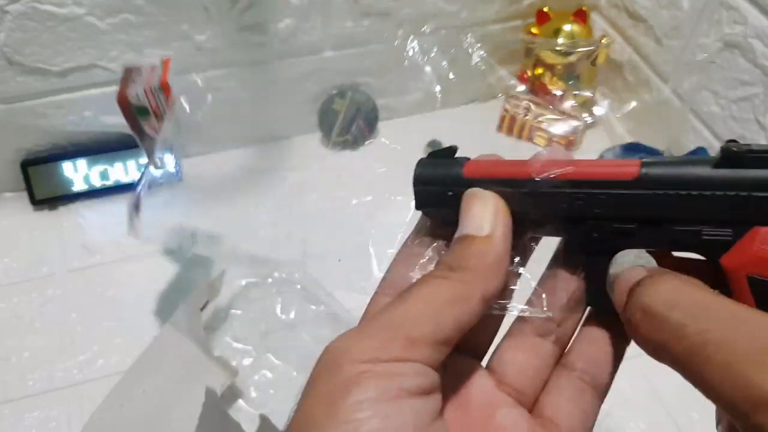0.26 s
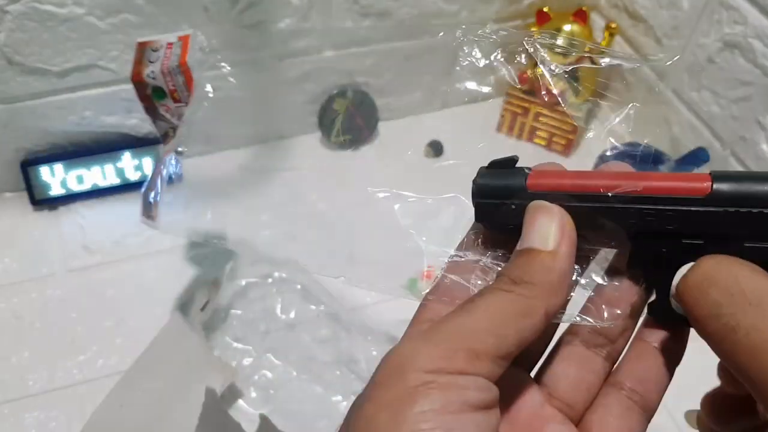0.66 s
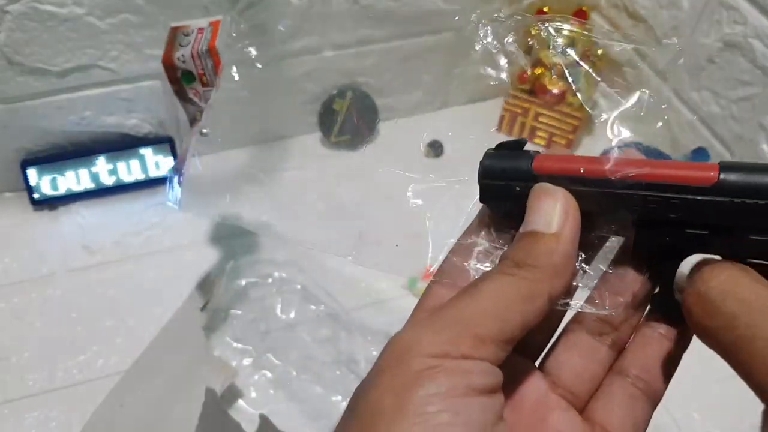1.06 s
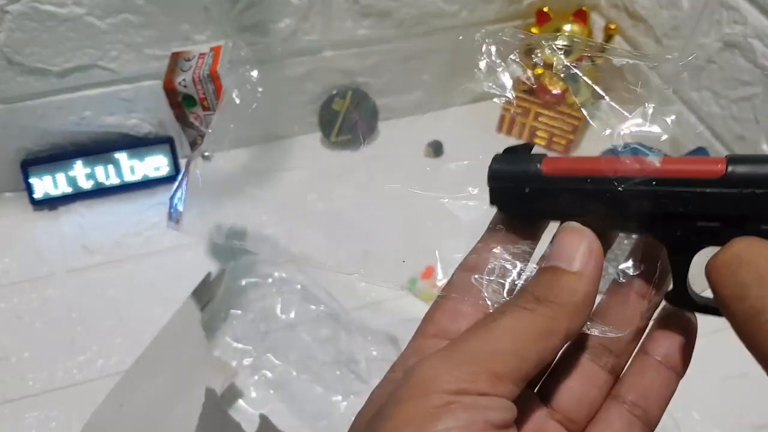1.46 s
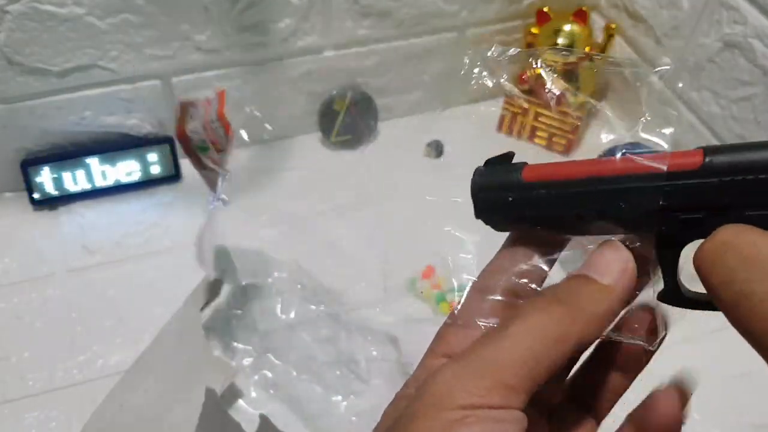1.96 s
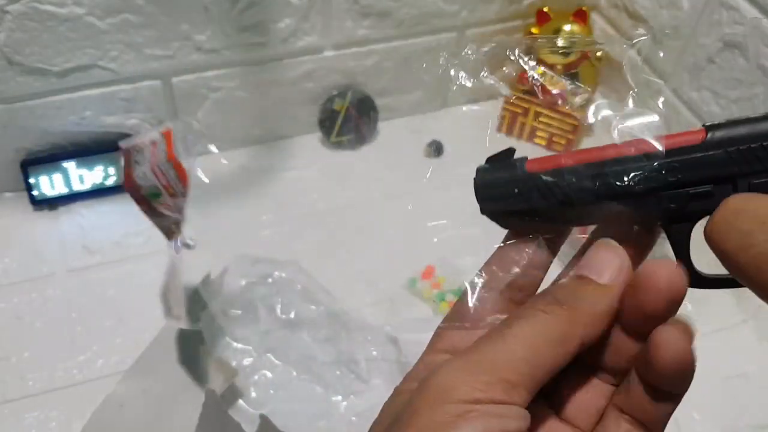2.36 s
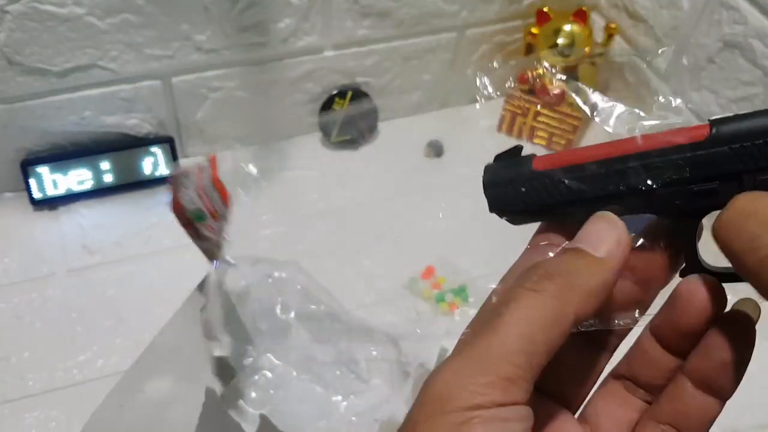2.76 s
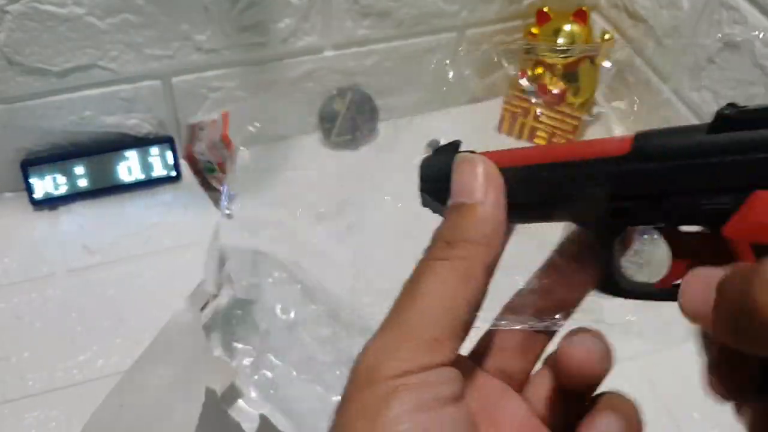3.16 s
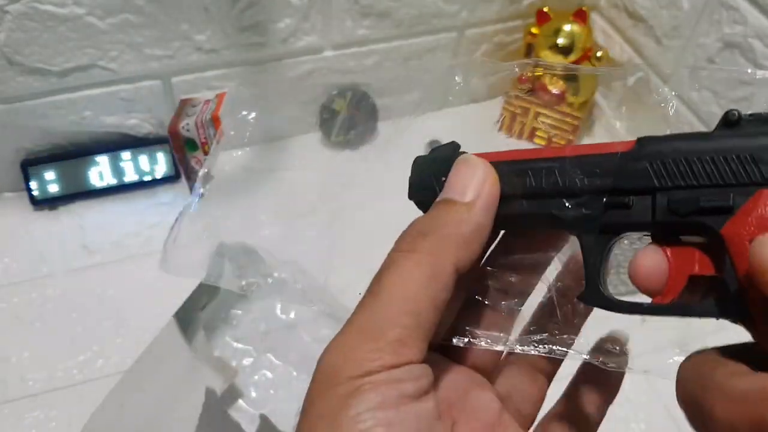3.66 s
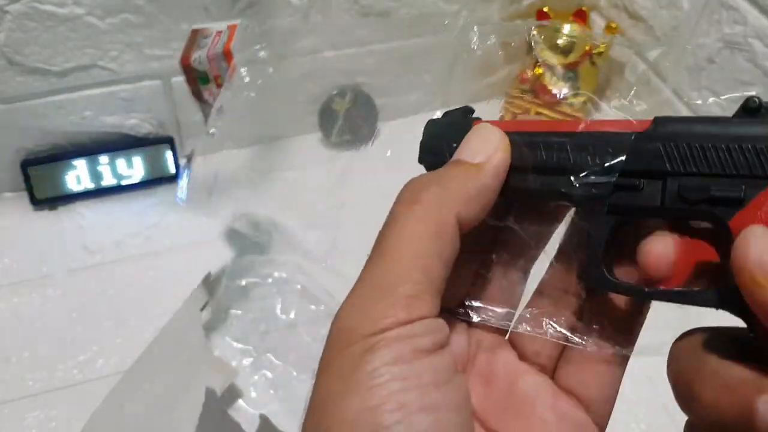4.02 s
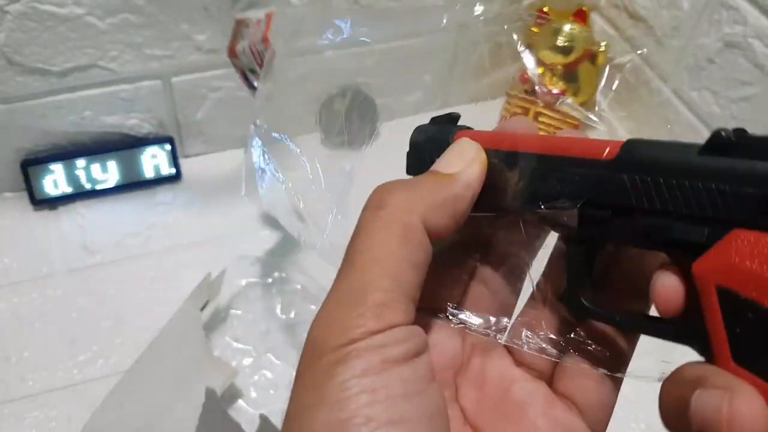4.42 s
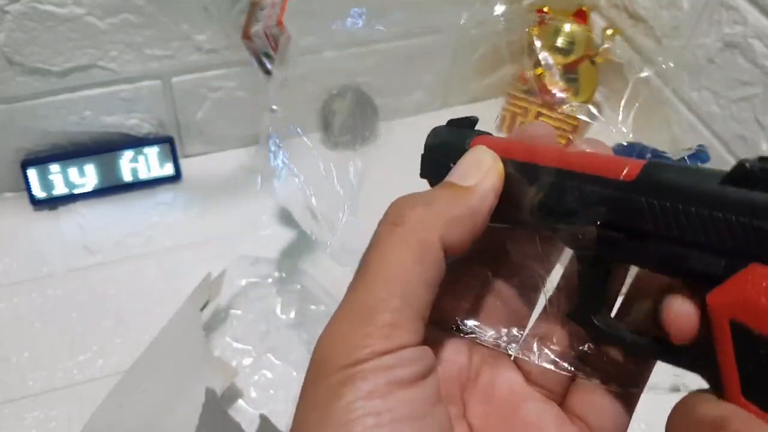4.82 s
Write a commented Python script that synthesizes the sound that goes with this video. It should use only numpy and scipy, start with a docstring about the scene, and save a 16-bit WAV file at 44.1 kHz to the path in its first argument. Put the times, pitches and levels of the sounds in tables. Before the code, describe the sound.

Brief crinkling of thin plastic, then a steady series of hard, dry spring-hammer cracks from a hollow toy pistol, each followed by a softer click as the trigger springs back. After a pause filled by crisp sheet crackle and faint knocks on the grip, two final snaps come, the last the strongest. Close stereo pickup, slightly left, short bright room tail, low background noise.

```python
"""A small hard room, with a plastic toy pistol held close to a stereo microphone. The trigger is pulled
seven times: a spring hammer snaps (noise bursts, ringing body modes, a low puff of pressure) and after
six of the snaps the trigger clicks back. A thin plastic sheet in the hand crinkles between, built from
popping creases. The room rings on as decaying noise, over low rumble, a faint tone and quiet air."""
import sys
import numpy as np
from scipy import signal
from scipy.fft import rfft, irfft
from scipy.io import wavfile
from scipy.ndimage import uniform_filter1d, minimum_filter1d

SR = 44100
rng = np.random.default_rng(int(sys.argv[2]) if len(sys.argv) > 2 else 0)


def nominal_scale(level):
    """Amplitude ratio for a level in decibels (scalar or array-like)."""
    x = np.asarray(level, float) / 20
    return 10 ** x


def wav_out(sig):
    """Save sig, one row per channel (or a flat mono array), as 16-bit PCM at SR to the path in sys.argv[1]."""
    wavfile.write(sys.argv[1], SR, np.round(np.clip(np.atleast_2d(sig).T, -1, 1) * 32767).astype(np.int16))


N = 224403  # length in samples

# Low rumble of the place. Each row: frequency in Hz, relative level in dB per Hz.
RUMBLE_SPECTRUM = [(25, -34), (70, -3.5), (110, -7), (190, -25), (350, -12), (800, -47.5)]
# Quiet air of the room. Each row: frequency in Hz, relative level in dB per Hz.
HUSH_SPECTRUM = [(150, -7.5), (800, -10), (2100, -3.5), (3500, -9.5), (7000, -22), (14000, -53)]
# Likeness of the background at the two microphones. Each row: frequency in Hz, likeness from 0 to 1.
LIKENESS = [(60, 1), (600, 0.47), (4000, 0.036)]
# Dying away of the room. Each row: frequency in Hz, t60 in s.
ROOM_T60 = [(200, 0.057), (700, 0.27), (2000, 0.36), (5000, 0.32), (10000, 0.27)]
# Course of the hand noise. Each row: time in seconds, sheet handling in dB (before the offsets in
# rustle and rubs), low rumble in dB.
HANDLING = [(0, -68, -51), (.12, -32.5, -60.5), (0.176, -50, -52.5), (0.259, -36, -49), (.35, -61, -54.5),
            (.6, -60, -56), (1.2, -58.5, -60.5), (1.9, -50, -66), (2.899, -48, -66.5), (3.3, -43, -64),
            (3.603, -41.5, -76), (3.678, -58.5, -74.5), (3.953, -55.5, -73), (4.028, -36, -61),
            (4.47, -45.5, -54), (4.8, -52.5, -65), (5.09, -46.5, -71)]
# Colour of the plastic sheet. Each row: frequency in Hz, relative level in dB per Hz.
SHEET_SPECTRUM = [(200, -30), (334, -20.5), (1140, -32), (1980, -11.5), (3560, -9.5), (6280, -1.5),
                  (11100, 3.5), (16000, 4.5)]
# The clearest creases of the sheet popping. Each row: start in seconds, peak in dB, facet pitch in Hz.
CREASES = [(0.0614, -37, 1520), (0.084, -28.5, 4580), (0.103, -25.5, 2760), (0.1208, -25, 4720),
           (0.1286, -27, 1050), (0.2009, -27.5, 1330), (0.2158, -20, 2030), (0.2559, -26, 1520),
           (0.283, -29, 1380), (0.298, -34.5, 2140), (0.3743, -29, 1450), (0.446, -37, 2200),
           (0.4906, -35.5, 3960), (0.585, -42, 2700), (1.059, -30.5, 2100), (1.279, -42.5, 2430),
           (1.329, -43.5, 2130), (1.3679, -33, 1900), (1.4123, -51, 1530), (1.4263, -40.5, 2780),
           (1.8405, -37.5, 2770), (1.87, -33.5, 1580), (2.241, -31, 2020), (2.3909, -34, 4570),
           (2.795, -34.5, 1680), (3.224, -38.5, 4160), (3.263, -42, 810), (3.29, -33.5, 1610),
           (3.311, -33, 2700), (3.393, -40, 2240), (3.4085, -32.5, 4760), (3.452, -31, 5700),
           (3.5192, -30.5, 3950), (3.5578, -31, 2120), (3.584, -36.5, 6560), (3.626, -28.5, 2080),
           (3.754, -40, 5300), (3.808, -35.5, 2180), (3.9764, -34, 3500), (4.0212, -23.5, 3720),
           (4.042, -27, 1370), (4.058, -27.5, 2720), (4.0899, -17.5, 3660), (4.1023, -17, 2080),
           (4.17, -22, 6730), (4.2223, -22.5, 3380), (4.25, -26, 7900), (4.343, -29, 910),
           (4.356, -26.5, 2840), (4.366, -26, 2270), (4.433, -30, 2150), (4.451, -28.5, 1550),
           (4.4667, -28, 3000), (4.4905, -30.5, 1590), (4.506, -32.5, 5500), (4.514, -22.5, 2700),
           (4.654, -37, 3170), (4.673, -38, 2980), (4.6964, -34, 2000), (4.711, -29, 2350),
           (4.757, -32, 2370)]
# Fingers knock the hollow grip. Each row: start in seconds, peak in dB, centre in Hz.
KNOCKS = [(3.621, -38, 300), (4.019, -39.5, 300), (4.079, -37, 380), (4.105, -31.5, 336), (4.186, -37, 725),
          (4.219, -30.5, 320), (4.592, -33, 630)]
# Loose parts rattle on after two snaps. Each row: start in seconds, peak in dB, t60 in s, centre in Hz,
# then three ringing pitches in Hz.
RATTLES = [(0.899, -16.5, 0.12, 4770, 5290, 4150, 2820), (4.537, -20, 0.12, 2210, 1320, 2045, 2980)]
# Modes of the hollow pistol body. Each row: frequency in Hz, mean relative level in dB, t60 in s.
BODY_MODES = [(1550, 2.5, 0.033), (2075, 4, 0.035), (2610, 1, 0.045), (3108, -5.5, 0.059), (3420, 0, 0.027),
              (4280, -1.5, 0.025), (5330, 2.5, .018), (5970, -2.5, .016)]
# The trigger springs back. Each row: start in seconds, peak in dB.
RETURNS = [(1.128, -17), (1.6827, -20), (2.17, -19.5), (2.665, -20), (3.062, -20.5), (4.7235, -16.5)]
# Colour of the trigger click. Each row: frequency in Hz, relative level in dB per Hz.
RETURN_CRACK = [(1000, -26), (2700, -4), (4800, -11), (6800, -6), (16000, -22)]
# Hammer snaps. Each row: start in seconds, peak in dB, low puff in dB relative to the peak,
# left-right difference of the puff in dB (before the pistol's own pan), rattle t60 in s,
# drive of the room in dB relative to the peak.
SNAPS = [(0.8904, -6, -8, 12.5, 0.012, -2), (1.4609, -8, -6.5, -0.5, 0.032, -6),
         (1.9594, -8, -6.5, 5, 0.027, -9), (2.473, -8, -9.5, 14, 0.031, -8),
         (2.8666, -7, -19.5, 8, 0.026, -10), (4.5279, -5.5, -3, 5.5, 0.006, -2),
         (4.9186, -4, -16.5, -21, 0.011, -13.5)]
# Colour of the hammer snap. Each row: frequency in Hz, relative level in dB per Hz.
SNAP_CRACK = [(290, -17.5), (1020, -12), (2230, -5), (3920, -2), (7100, -6.5), (9630, -4.5), (14000, -9),
              (16000, -25.5)]

PISTOL_PAN_DB = 3  # the pistol sits a little towards the left microphone


def read(points, hz):
    """A table read over log frequency."""
    table = np.transpose(points)
    return np.interp(np.log(hz + 1), np.log(table[0] + 1), table[1])


def amp_of(points, hz):
    """Gain of a dB spectrum."""
    return nominal_scale(read(points, hz))


def evened(x):
    """Scales to rms 1."""
    return x / np.sqrt(np.mean(x ** 2) + 1e-20)


def peaked(x):
    """Scales the smoothed peak envelope near 1, whatever the draw."""
    return x / np.sqrt(2 * uniform_filter1d((x ** 2).mean(0), 60).max())


def coloured(x, gain_at):
    """Filters the last axis by a gain over frequency."""
    hz = np.fft.rfftfreq(x.shape[-1], 1 / SR)
    return irfft(rfft(x) * gain_at(hz), x.shape[-1])


def left_right(pan_db):
    """Level in dB at each microphone for a left-right difference in dB."""
    return np.array([[pan_db], [-pan_db]]) / 2


def add(mix, s, sound, pan_db=0):
    """Lays a two-channel sound into the mix, starting at s seconds."""
    part = mix[:, max(round(s * SR), 0):][:, :sound.shape[1]]
    part += sound[:, :part.shape[1]] * nominal_scale(left_right(pan_db))


def burst(t60, rise, likeness, size=4096):
    """Noise with a short rise and an exponential fall, partly unrelated in the two microphones."""
    t = np.arange(size) / SR
    a, b = rng.standard_normal((2, size))
    likeness = np.clip(likeness, 0, 1)
    noise = np.array([a, likeness * a + np.sqrt(1 - likeness ** 2) * b])
    return noise * (1 - np.exp(-t / rise)) * nominal_scale(-60 * t / t60)


def background(spectrum):
    """Steady noise, more alike in both microphones at low pitch."""
    a, b = rfft(rng.standard_normal((2, N)))
    hz = np.fft.rfftfreq(N, 1 / SR)
    same = np.clip(read(LIKENESS, hz), 0, 1)
    pair = np.array([a, same * a + np.sqrt(1 - same ** 2) * b])
    return evened(irfft(pair * amp_of(spectrum, hz), N))


def rumble(level_db):
    """Low noise of moving level, with a faint steady-pitched tone under it."""
    tone = np.sin(2 * np.pi * 493 * np.arange(N) / SR)
    return nominal_scale(level_db) * (background(RUMBLE_SPECTRUM) + nominal_scale(-7) * tone)


def hush(rumble_db):
    """Quiet room air that swells a little with the rumble."""
    level_db = -59.5 + 0.75 * (rumble_db - rumble_db.mean())
    return nominal_scale(level_db) * background(HUSH_SPECTRUM)


def room(x, patchy_db=4):
    """A patchy diffuse tail of noise, dying at its own rate in each band."""
    hz, t, z = signal.stft(rng.standard_normal((2, SR // 2)), SR, nperseg=256)
    patches = uniform_filter1d(rng.standard_normal(z.shape[1:]), size=3, axis=0)
    patches = uniform_filter1d(patches, size=9, axis=1)
    fall_db = -60 * t / read(ROOM_T60, hz)[:, None]
    z = z * nominal_scale(fall_db + patchy_db * evened(patches))
    tail = signal.istft(z, SR, nperseg=256)[1]
    late = np.arange(tail.shape[1]) / SR
    tail = tail * np.clip(late / 0.0011, 0, 1)  # fades in over 1.1 ms
    tail = tail / np.linalg.norm(tail[0])
    return signal.fftconvolve(x, tail, axes=1)[:, :N]


def pop(centre_hz, t60, ring_db, size=2048):
    """One buckling crease: a wide tick and a short ring of the facet it bounds."""
    t = np.arange(size) / SR
    drawn_t60 = t60 * np.exp(0.3 * rng.standard_normal())
    tick = burst(drawn_t60, rise=0.0003, likeness=0.37, size=size)
    facet = np.sin(2 * np.pi * centre_hz * t) * nominal_scale(-60 * t * centre_hz / 22)  # about twenty cycles to silence
    rung = signal.fftconvolve(tick, facet[None], axes=1)[:, :size]

    def tick_gain(hz):
        """Strongest around the facet pitch, duller for large low facets."""
        hump_db = 20.0 * np.exp(-(np.log((hz + 1) / centre_hz) / 0.69) ** 2)
        dulling = np.hypot(1, (hz / (3.1 * centre_hz)) ** 3)
        return amp_of(SHEET_SPECTRUM, hz) * nominal_scale(hump_db) / dulling

    wide = coloured(tick, tick_gain)
    return peaked(peaked(wide) + nominal_scale(ring_db) * peaked(rung))


def rustle(level_db):
    """Many small creases in clumps; each of eighteen templates has its own pitch."""
    out = np.zeros((2, N))
    clumps = np.exp(0.9 * evened(uniform_filter1d(rng.standard_normal(N), 700)))
    for centre_hz in np.geomspace(900, 5000, num=18):
        struck = rng.random(N) < 30 * clumps / SR
        strength = nominal_scale(6.7 * np.minimum(rng.exponential(1, N), 3))
        train = struck * strength * rng.choice([-1, 1], N)
        template = pop(centre_hz, .005, ring_db=-1, size=1024)
        out += signal.oaconvolve(train[None], template, axes=1)[:, :N]
    return evened(out) * nominal_scale(level_db - 4.0)


def creases():
    """Each crease pops, with small slips around it; the pistol in the same hand rings along."""
    out = np.zeros((2, N))
    for s, peak_db, centre_hz in CREASES:
        add(out, s, nominal_scale(peak_db) * pop(centre_hz, 0.0089, -4.0), pan_db=8.0)
        drive = burst(0.006, rise=0.00072, likeness=0.38, size=2048)
        add(out, s, nominal_scale(peak_db - 7.5) * ring(drive))
        for later, louder, shift in rng.standard_normal((4, 3)):
            slip = pop(centre_hz * np.exp(0.28 * shift), 0.009, -5)
            add(out, s + .002 + .005 * later, nominal_scale(peak_db - 9 + 3.0 * louder) * slip)
    return out


def knock(centre_hz):
    """One soft low knock on the grip: noise through a single broad resonance."""
    thud = burst(0.02, rise=0.0032, likeness=0.96, size=2048)
    return peaked(coloured(thud, lambda hz: 1 / (1 + ((hz - centre_hz) / (0.21 * centre_hz)) ** 2)))


def rubs(level_db):
    """Skin and sheet slide on the hollow grip: many faint knocks and a few clear ones."""
    out = np.zeros((2, N))
    for centre_hz in (280, 370, 600):
        struck = rng.random(N) < 45 / SR  # about 45 a second
        train = struck * nominal_scale(3.5 * np.minimum(rng.exponential(1, N), 3))
        out += signal.oaconvolve(train[None], knock(centre_hz), axes=1)[:, :N]
    out = evened(out) * nominal_scale(level_db - 15.0)
    for s, peak_db, centre_hz in KNOCKS:
        add(out, s, nominal_scale(peak_db) * knock(centre_hz), PISTOL_PAN_DB)
    return out


def rattles():
    """Dense uneven knocking of loose parts, strongest around one pitch, with three parts ringing."""
    out = np.zeros((2, N))
    t = np.arange(2048) / SR
    for s, peak_db, t60, centre_hz, *rings_hz in RATTLES:
        uneven = np.exp(0.5 * evened(uniform_filter1d(rng.standard_normal(8192), size=60)))
        knocks = burst(t60, rise=0.004, likeness=0.96, size=8192) * uneven
        for hz in rings_hz:
            mode = nominal_scale(-60 * t / 0.019) * np.sin(2 * np.pi * hz * t)
            rung = peaked(signal.fftconvolve(knocks, mode[None], axes=1))
            add(out, s, nominal_scale(peak_db - 3.5) * rung, PISTOL_PAN_DB)
        hump = coloured(knocks, lambda hz: np.exp(-(np.log((hz + 1) / centre_hz) / 0.5) ** 2))
        add(out, s, nominal_scale(peak_db) * peaked(hump), PISTOL_PAN_DB)
    return out


def ring(drive):
    """The pistol body rung by a drive; each blow lands elsewhere and weighs the modes anew."""
    t = np.arange(drive.shape[1]) / SR
    spread_db = 1.5 * rng.standard_normal(len(BODY_MODES))
    body = np.zeros(len(t))
    for (hz, db, t60), more_db in zip(BODY_MODES, spread_db):
        body += nominal_scale(db + more_db - 60 * t / t60) * np.sin(2 * np.pi * hz * t)
    rung = signal.fftconvolve(drive, body[None], axes=1)[:, :len(t)]
    return peaked(coloured(rung, lambda hz: 1 - 1 / (1 + (hz / 850) ** 4)))  # too small to radiate bass


def pressure_puff(t, thump_hz):
    """Air moved by the blow: suction with a slow swing back, and a short push from the grip."""
    u = np.maximum(t - .0008, 0) * thump_hz * 2 * np.pi
    suction = -np.e * u * (1 - u / 2) * np.exp(-u)
    push = 0.72 * np.sin(2 * np.pi * 400 * t) * nominal_scale(-60 * t / 0.0049)  # air in the grip pushes first
    return suction + push


def hits(rows, pan_db, crack, body_db, body_in_room_db, thump_hz, lead_db):
    """Plastic parts rattle for some ms: wide crack, ringing body, puff. Returns direct sound and room feed."""
    near, feed = np.zeros((2, N)), np.zeros((2, N))
    t = np.arange(4096) / SR
    for s, peak_db, thump_db, puff_pan_db, t60, room_db in rows:
        rattle = burst(t60, rise=0.00075, likeness=0.014)
        rattle = peaked(coloured(rattle, lambda hz: amp_of(crack, hz)))
        impulse = np.ones((2, 1)) * (t == t[88])
        blow = peaked(coloured(impulse, lambda hz: amp_of(crack, hz)))  # the first impact fills the room
        clean_knock = 5 * (t == t[20])  # leads the drive
        rung = ring(burst(t60 / 3, rise=0.0001, likeness=0.83) + clean_knock)
        puff = nominal_scale(thump_db + left_right(puff_pan_db)) * pressure_puff(t, thump_hz)
        direct = peaked(rattle + nominal_scale(body_db) * rung) + puff
        add(near, s, nominal_scale(peak_db) * direct, pan_db)
        # a fainter copy of the same noise leads each hit by 2.8 ms
        add(near, s - .0028, nominal_scale(peak_db + lead_db) * rattle, pan_db)
        add(feed, s, nominal_scale(peak_db + room_db) * (2 * blow + nominal_scale(body_in_room_db) * rung))
    return near, feed


def trigger_returns():
    """The trigger springs back: a light click with hardly any thump."""
    light = [(s, peak_db, -40, 0, 0.019, -19.5) for s, peak_db in RETURNS]  # remaining columns as in SNAPS
    return hits(light, PISTOL_PAN_DB, RETURN_CRACK, body_db=-2, body_in_room_db=-13,
                thump_hz=300, lead_db=-22)


def hammer_snaps():
    """The spring hammer strikes: a bright crack, the body and a low puff."""
    return hits(SNAPS, PISTOL_PAN_DB, SNAP_CRACK, body_db=-10, body_in_room_db=-15.5,
                thump_hz=120, lead_db=-15)


def scene():
    """Background, room, sheet and pistol together at the microphones."""
    s, sheet_db, rumble_db = np.transpose(HANDLING)
    t = np.arange(N) / SR
    sheet_db, rumble_db = np.interp(t, s, sheet_db), np.interp(t, s, rumble_db)
    snaps, snap_feed = hammer_snaps()
    returns, return_feed = trigger_returns()
    sheet = creases() + rustle(sheet_db) + rubs(sheet_db)
    wet = room(snap_feed) + room(return_feed + nominal_scale(-12) * sheet)
    return snaps + rattles() + returns + sheet + wet + rumble(rumble_db) + hush(rumble_db)


def top_cut(x):
    """Nothing passes above the cut-off."""
    return signal.sosfilt(signal.butter(12, 16650, fs=SR, output="sos"), x)


def record(dry):
    """One hears a brief drop in level before sudden hits; then a band limit and a hard ceiling."""
    slope_power = (np.gradient(dry, axis=1) ** 2).mean(0)  # weighted to the treble
    power_db = 10 * np.log10(abs(uniform_filter1d(slope_power, size=88)) + 1e-12)
    coming_db = -minimum_filter1d(-power_db, size=441, origin=-220)  # loudest of the next 10 ms
    drop_db = 0.78 * np.maximum(coming_db - power_db - 22.0, 0)
    with_drops = dry * nominal_scale(-uniform_filter1d(drop_db, size=44))
    limited = coloured(with_drops, lambda hz: 1 / np.hypot(1, (hz / 15900) ** 40))
    return top_cut(np.clip(limited, -1, 1))


dry = scene()
out = record(dry)
wav_out(out)
```